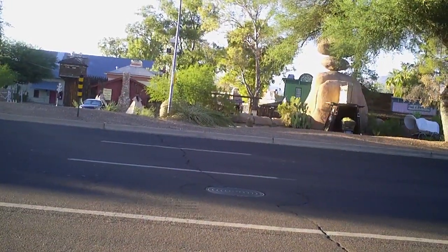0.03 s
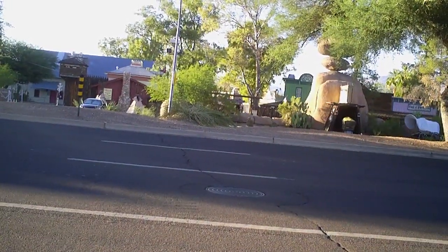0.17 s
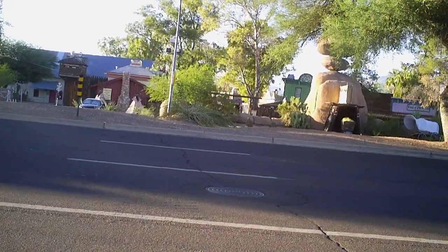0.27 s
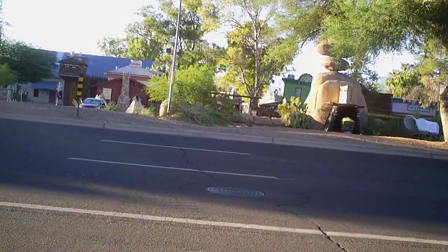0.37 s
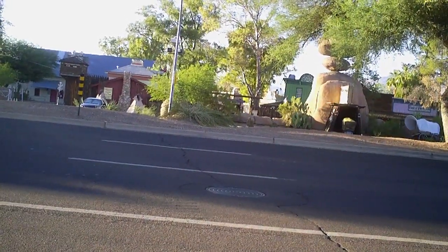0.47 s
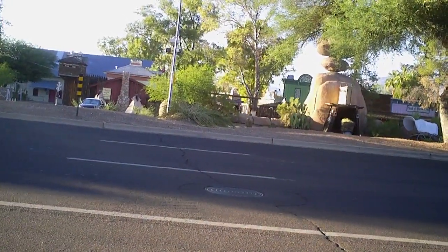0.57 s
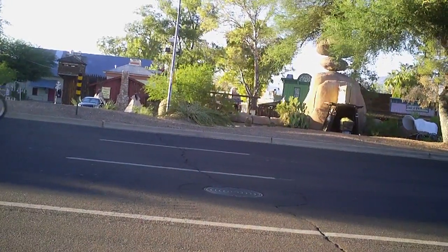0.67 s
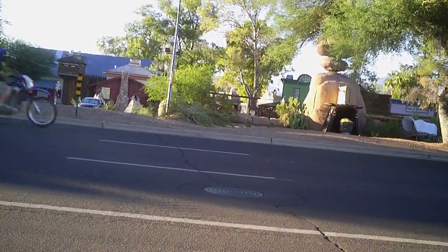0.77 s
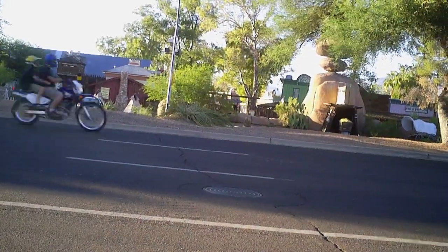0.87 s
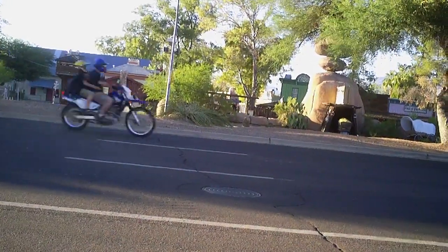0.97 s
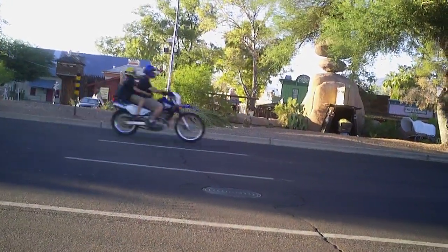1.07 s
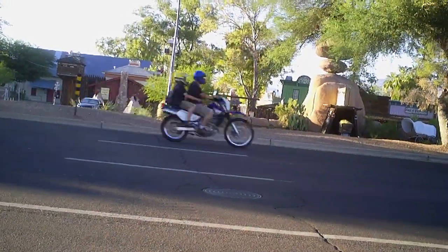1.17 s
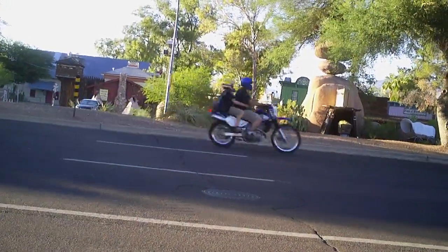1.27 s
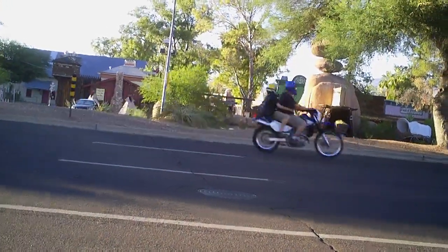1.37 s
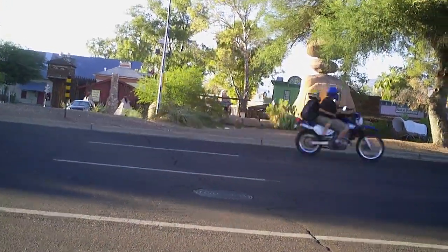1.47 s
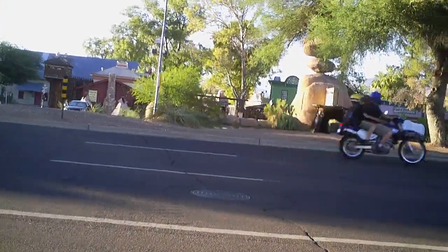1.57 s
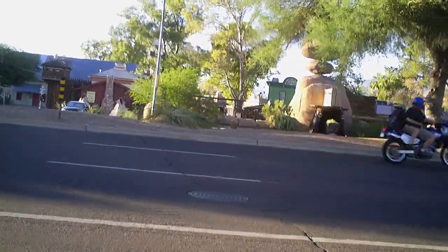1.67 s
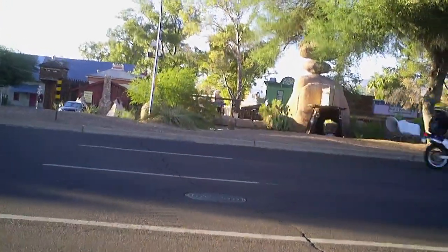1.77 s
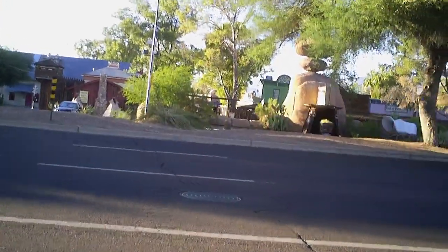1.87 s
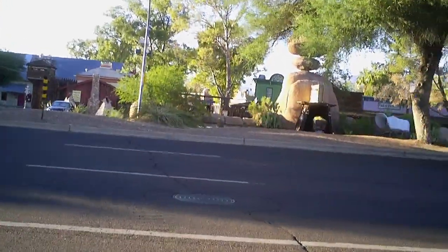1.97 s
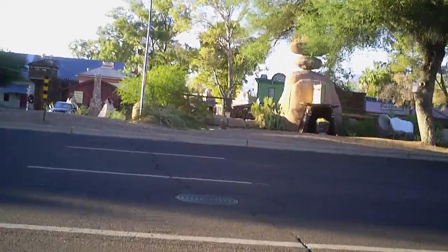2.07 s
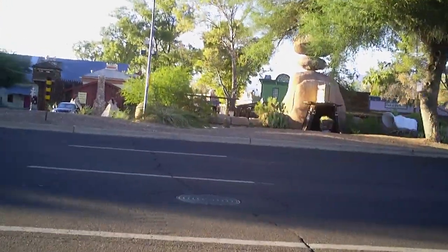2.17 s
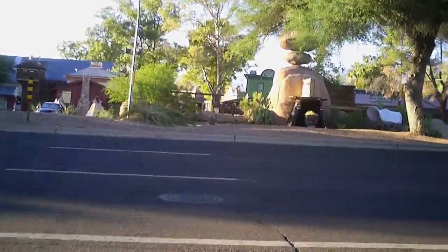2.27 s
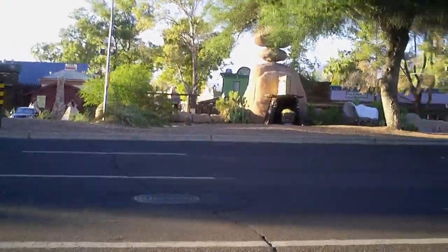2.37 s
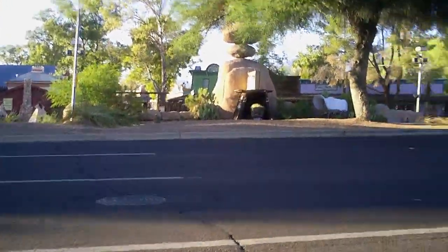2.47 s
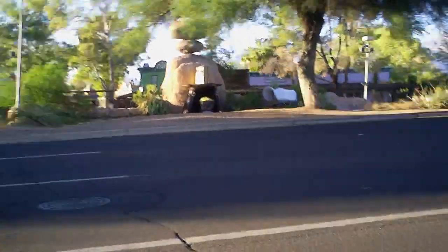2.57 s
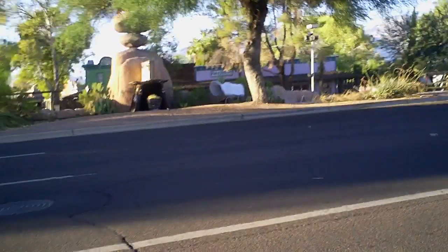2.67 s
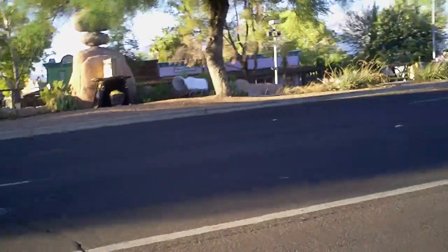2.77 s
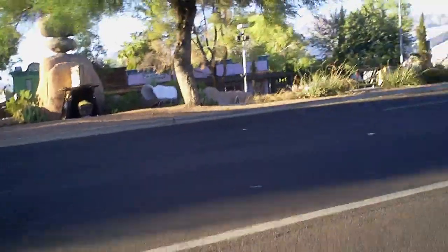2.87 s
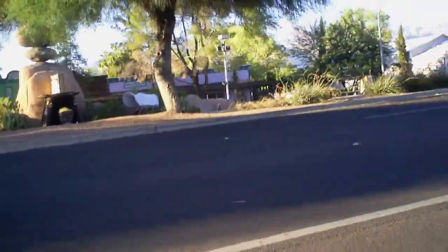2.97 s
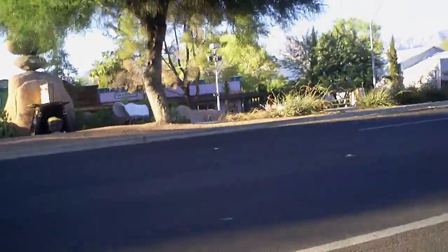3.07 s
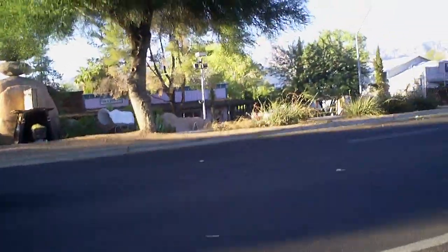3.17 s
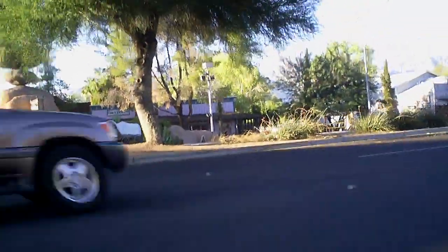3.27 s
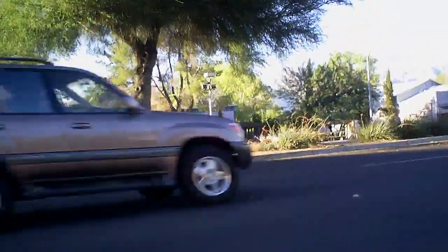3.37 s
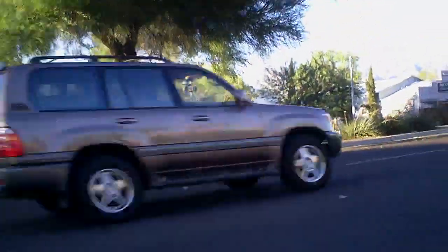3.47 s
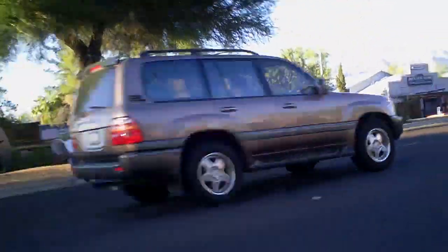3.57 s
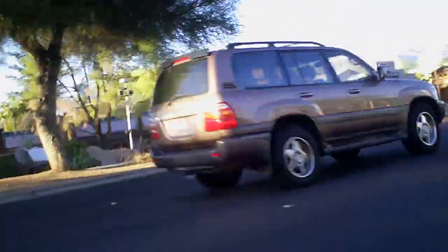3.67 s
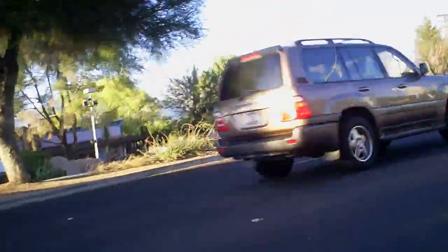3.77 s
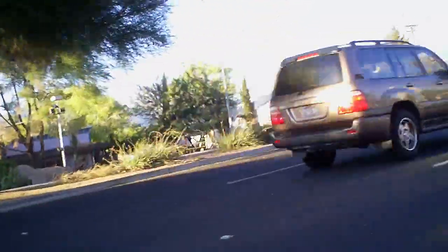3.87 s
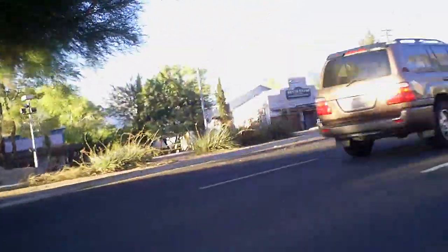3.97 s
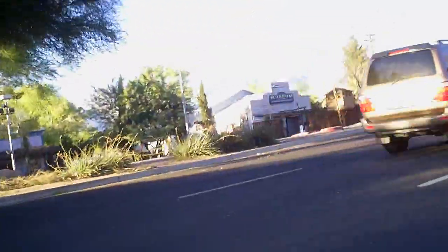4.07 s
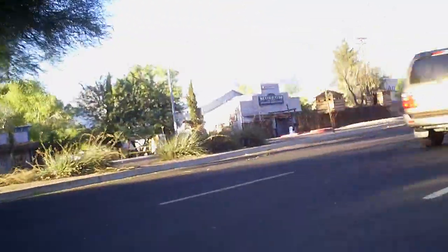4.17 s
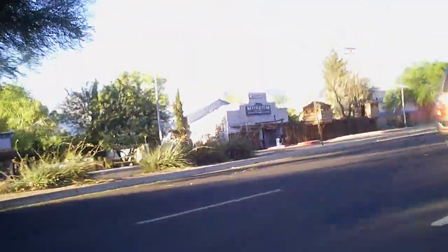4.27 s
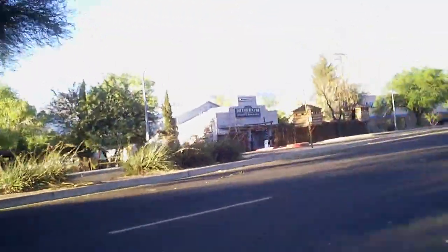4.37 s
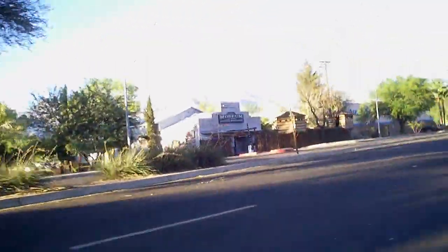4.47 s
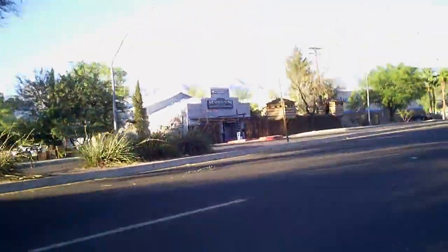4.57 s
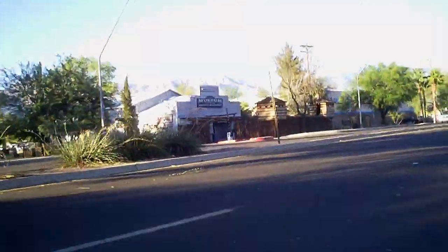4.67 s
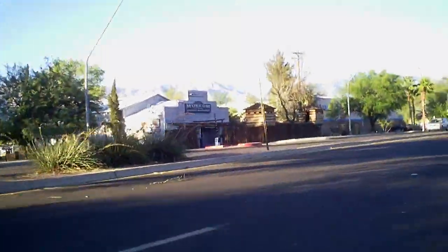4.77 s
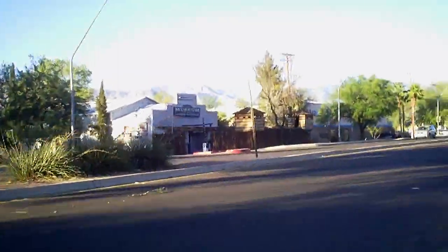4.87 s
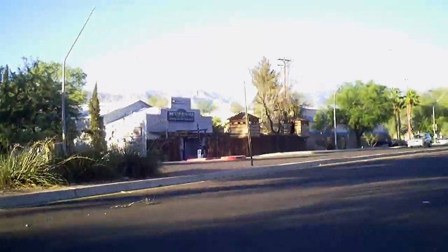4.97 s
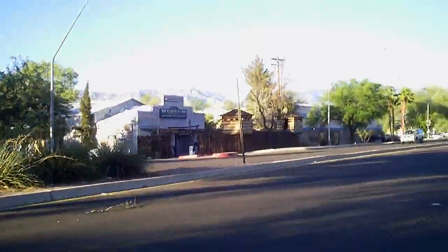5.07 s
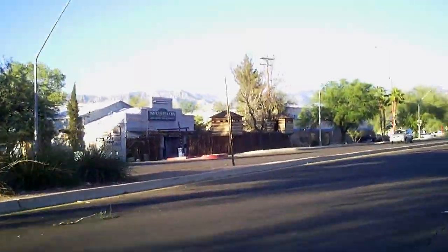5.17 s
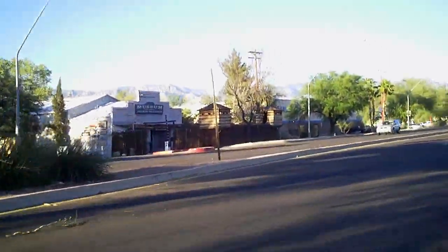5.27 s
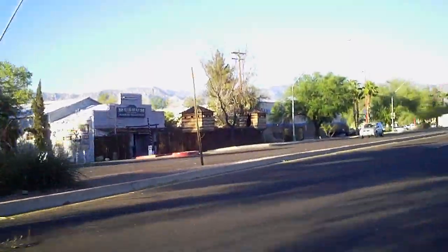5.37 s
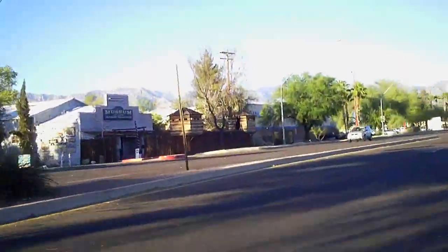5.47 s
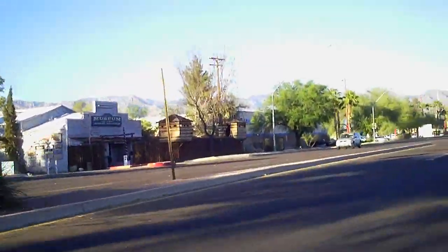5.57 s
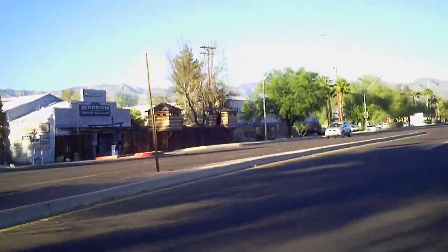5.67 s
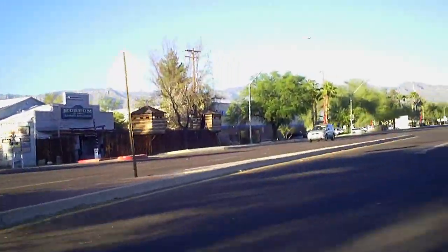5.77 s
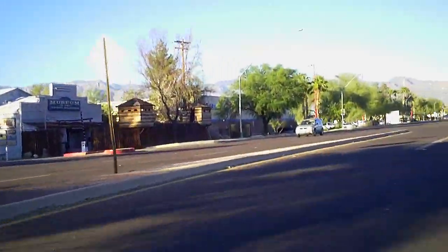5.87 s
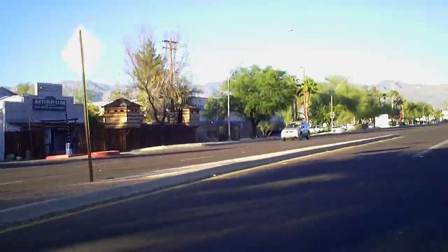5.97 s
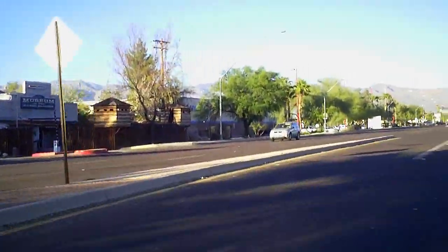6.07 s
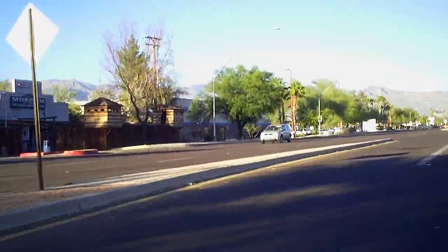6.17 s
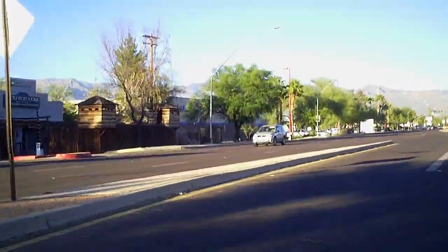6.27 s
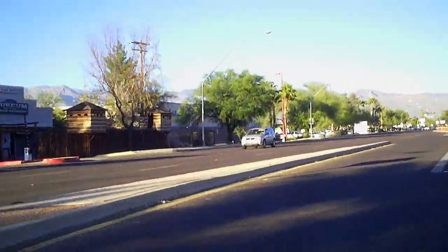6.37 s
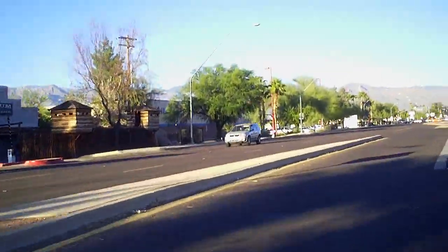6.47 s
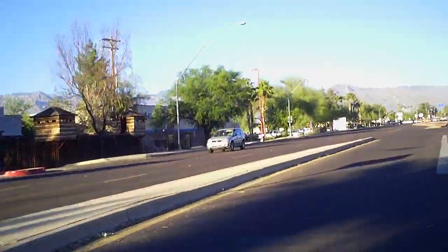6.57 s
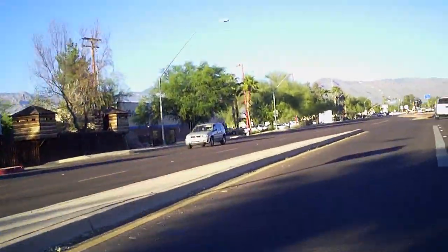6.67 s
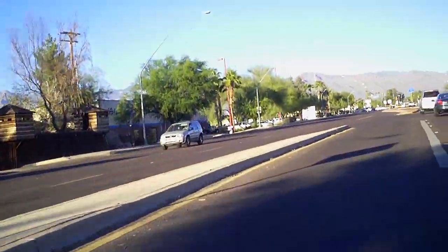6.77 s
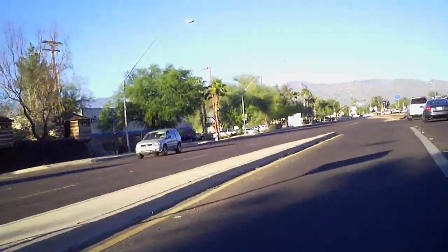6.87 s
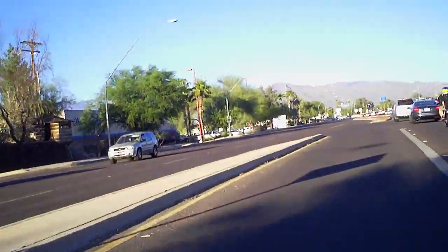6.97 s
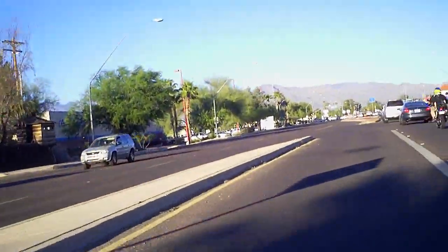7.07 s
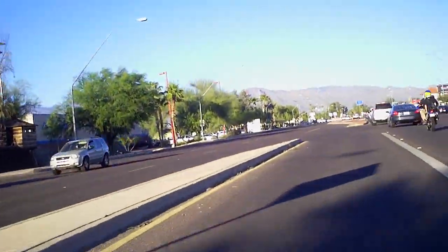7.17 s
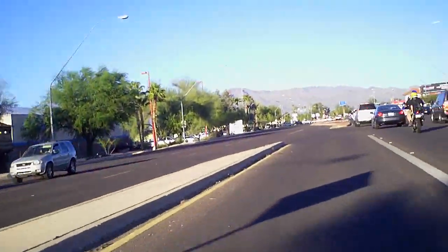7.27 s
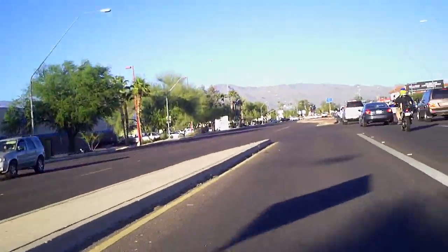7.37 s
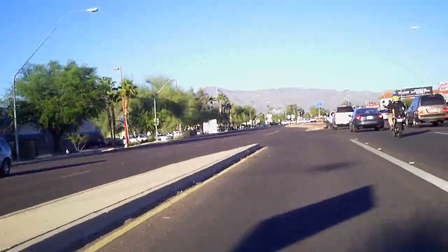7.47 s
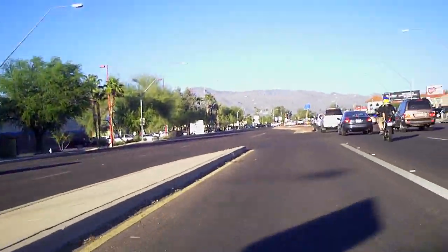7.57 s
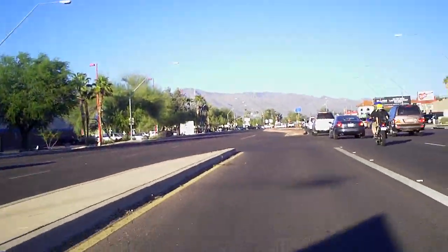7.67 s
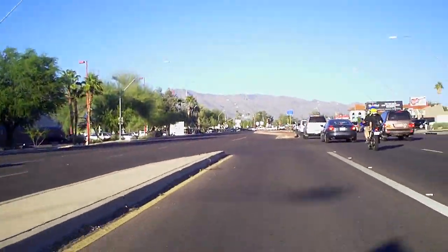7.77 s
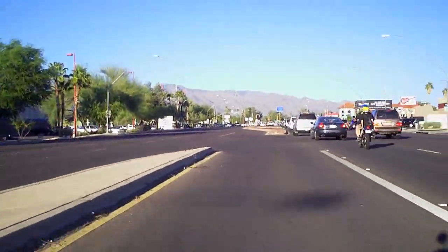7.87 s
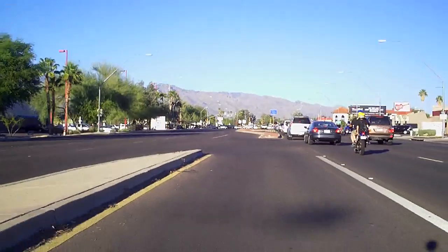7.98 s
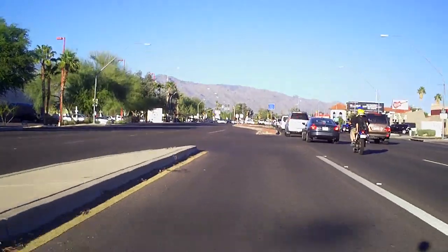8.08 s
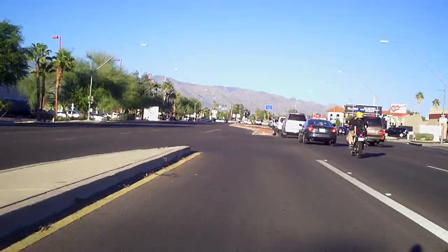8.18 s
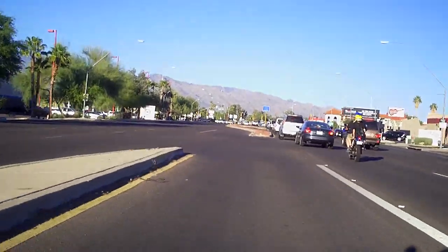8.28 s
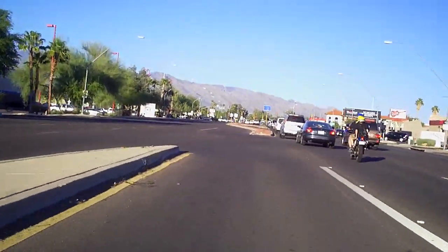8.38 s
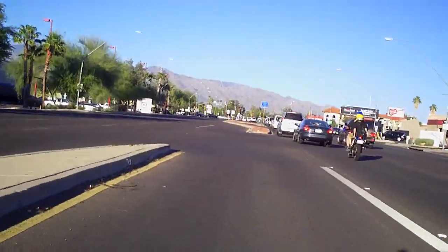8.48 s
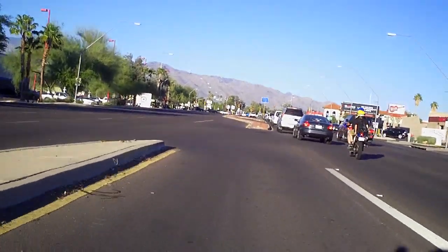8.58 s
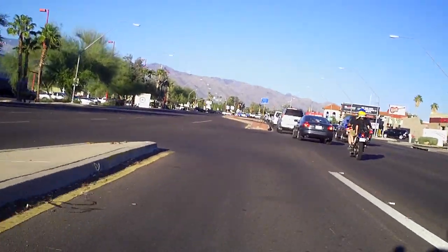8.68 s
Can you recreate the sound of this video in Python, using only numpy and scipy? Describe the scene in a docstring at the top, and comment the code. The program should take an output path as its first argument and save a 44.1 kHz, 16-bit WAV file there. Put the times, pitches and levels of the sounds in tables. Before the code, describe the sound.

A twin-cylinder motorcycle idles with lumpy thumps, then pulls away through two roaring, distorted throttle bursts and settles into a droning cruise with buffeting wind.

```python
"""A twin-cylinder motorcycle engine, heard by a microphone riding on the machine: it idles with uneven thumps,
revs, pulls away through two throttle bursts that overdrive the input, then cruises.
Blows from the cylinders ring the exhaust, and engine orders under throttle add up to a drone.
A gear whines with the crank, noise rings the cases and the frame, distant tyres and passing cars hiss
along the road, and slow noise makes the head wind that buffets the microphone."""
import sys
import numpy as np
from scipy import signal
from scipy.fft import rfft, irfft, next_fast_len
from scipy.io import wavfile
from scipy.ndimage import uniform_filter1d, map_coordinates

SR = 44100
rng = np.random.default_rng(int(sys.argv[2]) if len(sys.argv) > 2 else 0)


def inscribe(sig):
    """Save sig as 16-bit PCM at rate SR to the path in sys.argv[1].

    A 1-D sig is mono; a 2-D sig holds one channel per row.
    Samples are clipped to [-1, 1] before scaling.
    """
    pcm = np.round(np.clip(np.atleast_2d(sig).T, -1, 1) * 32767)
    wavfile.write(sys.argv[1], SR, pcm.astype(np.int16))


N = 385434  # samples

THROTTLE_S = 1.36  # idle ends and the throttle opens

# Engine speed. Each row: time in seconds, engine cycles per second.
ENGINE_SPEED = [(0, 17.1), (.25, 16.7), (.45, 16.6), (.5, 17.2), (.65, 16.7), (.71, 17.8), (.87, 16.6),
                (.94, 17.8), (1.05, 17.2), (1.26, 16.8), (1.43, 24.2), (1.58, 29.3), (1.7, 30.8),
                (1.97, 32.2), (2.26, 32.5), (2.45, 30.3), (2.66, 27.7), (2.82, 27.2), (3.02, 28.1),
                (3.29, 27.1), (3.63, 31.7), (3.85, 34.3), (4.31, 43.8), (4.55, 49.1), (4.74, 43.6),
                (4.89, 52.1), (4.99, 48.4), (5.15, 38.6), (5.4, 40.5), (5.6, 42.5), (5.85, 43.5),
                (5.9, 40.6), (6.11, 28.9), (6.19, 28.5), (6.22, 31.3), (6.32, 37.8), (6.44, 34.2),
                (7.4, 35.6), (7.95, 35.8), (8.07, 31.2), (8.09, 31.2), (8.12, 36.8), (8.23, 33.4),
                (8.3, 34.8), (8.58, 32.3), (8.62, 32.9), (8.74, 29.8)]
# How hard the engine works. Each row: time in seconds, effort in dB, extra drone in dB,
# intake roar over the effort in dB (before a fixed 3 dB cut), boost of the odd engine orders in dB.
ENGINE_EFFORT = [(0, -35, 0, -5.5, 0), (1.22, -31.5, 5.5, -4.5, 3.5), (1.56, -17.5, 2, 1, 0),
                 (2.29, -15.5, 2, -1, 1), (2.5, -17, -1, -0.5, 0.5), (2.8, -17, 3, 0, -2.5),
                 (3.15, -17.5, 5, -0.5, -1.5), (3.6, -13, 1, 0.5, 6), (4.02, -10, -1.5, 1, 3),
                 (4.3, -0.5, 2, -4, -6), (4.6, 0, -2.5, -2, -7), (4.73, -11.5, 1.5, 1.5, 1),
                 (4.83, -1.5, 2.5, 0.5, -0.5), (4.99, -1, 2.5, -0.5, -6.5), (5.16, -8, -1.5, -2, 0.5),
                 (5.55, -5, 1.5, -2, 0.5), (5.62, -3, 1, -1, -2.5), (5.87, -4, 3.5, -1.5, -6),
                 (5.95, -14.5, -3, -0.5, -0.5), (6.08, -17.5, 1.5, -3, -0.5), (6.35, -13, -2, -2, 1.5),
                 (7.1, -13, -1, -1.5, -1), (7.9, -13.5, 0.5, -1, -4.5), (8.05, -12.5, -1.5, -3, -3.5),
                 (8.2, -12, -3.5, -0.5, -2), (8.74, -17.5, 1, 1, -4)]


def amp(db):
    """dB to gain."""
    return 10 ** (np.asarray(db) / 20)


def unit(x):
    """Scaled to rms 1."""
    return x / np.sqrt(np.mean(x ** 2) + 1e-20)


def along(points, hz):
    """Value at hz between (Hz, value) points on a log axis."""
    f, v = np.transpose(points)
    return np.interp(np.log(hz + 1), np.log(f + 1), v)


def curves(rows):
    """One value per sample for each column after the time."""
    s, *columns = np.transpose(rows)
    t = np.arange(N) / SR
    return [np.interp(t, s, column) for column in columns]


def wobble(rate):
    """A smooth random curve with rate knots a second."""
    knots = rng.standard_normal(int(N * rate / SR) + 4)
    return map_coordinates(knots, [np.arange(N) * rate / SR])


def filtered(x, response):
    """x through a complex response, a function of frequency in Hz."""
    m = next_fast_len(N + SR // 2)  # room for the tail
    return irfft(rfft(x, m) * response(np.fft.rfftfreq(m, 1 / SR)), m)[..., :N]


def resonant(x, modes):
    """x through parallel damped resonances (Hz, width Hz, dB) of alternating sign."""
    def response(f):
        return sum((-1) ** k * amp(db) * 1j * f * width / (hz * hz - f * f + 1j * f * width)
                   for k, (hz, width, db) in enumerate(modes))
    return filtered(x, response)


def low_passed(x, corner_hz, order):
    """x with its treble rolled off by a chain of one-pole low-passes."""
    return filtered(x, lambda hz: 1 / (1 + 1j * hz / corner_hz) ** order)


def noise(spectrum):
    """Coloured noise of rms 1."""
    return unit(filtered(rng.standard_normal(N), lambda hz: amp(along(spectrum, hz))))


def idle_firings():
    """Lumpy blows into the pipe: uneven in time, every other one stronger."""
    count, first_s, gap_s, jitter_s = 23, .013, .059, .0015
    level_db, lope_db, scatter_db = -15, 1.2, 0.5  # level is ahead of the pipe
    k = np.arange(count)
    chance = rng.standard_normal((count, 2))
    s = first_s + gap_s * k + jitter_s * chance[:, 0]
    size_db = level_db - lope_db * (-1) ** k + scatter_db * chance[:, 1]
    return np.bincount((s * SR).astype(int), amp(size_db), N)


def loaded_firings():
    """Under throttle two cylinders blow half an engine cycle apart, harder with effort."""
    bark_db, bark_grows = -4.5, 1.2  # at effort 0, ahead of the silencer; dB per dB of effort
    second_share = 0.54  # second cylinder against the first when the odd orders stand at 0 dB
    rate, = curves(ENGINE_SPEED)
    effort_db, _, _, odd_db = curves(ENGINE_EFFORT)
    blow_db = bark_db + bark_grows * effort_db
    second = np.clip(1 - (1 - second_share) * amp(odd_db), 0, 1)
    halves = np.floor(2 * np.cumsum(rate) / SR)
    throttle_open = np.arange(N - 1) > THROTTLE_S * SR
    at = np.flatnonzero((np.diff(halves) > 0) & throttle_open)
    scattered_db = blow_db[at] + 0.62 * rng.standard_normal(len(at))
    size = np.where(halves[at] % 2, second[at], 1) * amp(scattered_db)
    return np.bincount(at, size, N)


def exhaust(idle, loaded):
    """The pipe thumps and rings after every blow; the valve opens gradually, so the blows are soft."""
    # Idle ring of the pipe. Each row: Hz, width in Hz, relative level in dB.
    pipe_modes = [(35, 6.7, -28), (213.3, 8.3, -2), (251, 52, -15.5), (356, 14, -6), (530, 20, -10)]
    # Silencer under load. Each row: Hz, width in Hz, relative level in dB.
    silencer_modes = [(350, 40, -4.5), (385.4, 60, -0.5), (424, 70, -3)]
    # Idle thump. One row: Hz, width in Hz, gain in dB.
    thump_mode = [(91.5, 61, 50.5)]
    (hz, width, db), = thump_mode
    thump = idle
    for _ in range(3):  # three passes let it swell before it dies
        thump = resonant(thump, [(hz, width, 0)])
    idling = np.arange(N) < THROTTLE_S * SR
    gas = amp(-44.5) * rng.standard_normal(N) * idling  # steady flow in the pipe
    ring = amp(49.0) * low_passed(resonant(idle + gas, pipe_modes), corner_hz=290, order=2)
    bark = amp(45.5) * low_passed(resonant(loaded, silencer_modes), corner_hz=720, order=2)
    return amp(db) * thump + ring - bark


def burst(blows, decay_s):
    """Envelope averaging near 1 that jumps at each firing and dies away."""
    puff = signal.lfilter([1], [1, -np.exp(-1 / (decay_s * SR))], blows)
    return puff / (uniform_filter1d(puff, size=SR // 8) + 1e-9)


def roar(blows):
    """Turbulent intake gas: coloured noise puffed once a firing."""
    # Spectrum of the rush. Each row: Hz, relative density in dB per Hz.
    roar_spectrum = [(20, -41.5), (45, -18.5), (75, -6.5), (130, -0.5), (250, 1), (420, -0.5), (600, -7.5),
                     (900, -52.5), (1500, -40), (2500, -88.5)]
    effort_db, _, above_db, _ = curves(ENGINE_EFFORT)
    level_db = effort_db + above_db - 3 + 1.0 * wobble(6.3)
    puffing = 1.7 + 0.21 * burst(blows, decay_s=0.032)
    return amp(level_db) * unit(noise(roar_spectrum) * puffing)


def spiky_noise(extra):
    """White noise with rare samples enlarged by extra times their size."""
    return rng.standard_normal(N) * (1 + extra * (rng.random(N) < .003))


def rattle(blows):
    """Valve gear, chain and each firing shake the cases, which ring and hiss."""
    # Ringing of the engine cases. Each row: Hz, width in Hz, relative level in dB.
    case_modes = [(874, 99, 0), (1044, 63, 1.5), (1181.4, 29, 5.5), (1382, 30, 2), (1500, 36, -0.5),
                  (1688, 147, 0.5), (2113, 247, -8), (2742, 70, -14), (3320, 180, -13), (3836, 42, -8.5),
                  (4310, 304, -14.5)]
    # Broad hiss of the case walls. Each row: Hz, relative density in dB per Hz.
    wall_spectrum = [(300, -19.5), (700, -2), (1200, -3), (1800, -15), (2300, -17), (3500, -20.5),
                     (4700, -33), (7000, -37), (12000, -78.5)]
    level_at_full_db, grows = -22, 0.57  # ring at effort 0; dB per dB of effort
    swell = 1.01 + 0.075 * uniform_filter1d(burst(blows, decay_s=0.0025), size=SR // 300)
    clatter = unit(spiky_noise(9.7)) * swell
    knocks = unit(np.diff(burst(blows, decay_s=0.00024), prepend=0))
    ring = unit(resonant(clatter + 0.37 * knocks, case_modes))
    hiss = 1.23 * swell * noise(wall_spectrum)
    level_db = level_at_full_db + grows * curves(ENGINE_EFFORT)[0] + 0.25 * wobble(10)
    return amp(level_db) * (ring + hiss)


def whine(idle, blows):
    """Gear mesh tone and octave; firings kick the crank, idle compression slows it and loads the teeth."""
    # Gear cover. Each row: Hz, width in Hz, relative level in dB.
    cover_modes = [(800, 280, -11.5), (1408, 63, 1.5), (1510, 49, 4), (1666, 160, -4), (1727, 35, -0.5),
                   (1915, 168, -2.5)]
    # Each row: time in seconds, whine level ahead of the cover in dB, depth of the throb once a cycle,
    # speed swing within a cycle as a share of the speed.
    whine_course = [(0, -32.5, 0.12, .01), (1.24, -32, 0.12, .01), (1.3, -35, 0.2, .01),
                    (1.45, -29, 1.3, .01), (1.6, -26.5, 0.99, 0.015), (1.95, -28, 0.45, -0.009),
                    (2.25, -26, 0.93, -.025), (2.42, -27.5, 0.67, 0.016), (2.6, -30, 1.3, .015),
                    (2.9, -31.5, 1, 0.015), (3.2, -33, 0.89, .015), (3.35, -27, 1.1, 0.015),
                    (3.5, -25.5, 1.2, 0.014), (3.75, -26.5, .8, .012), (3.95, -25.5, 1.5, 0.0047),
                    (4.2, -39, 0.6, .01), (5, -24, 1.6, .01), (5.84, -44, 1, .01), (5.89, -39, 0, -0.0096),
                    (5.99, -30, 0, 0.01), (6.1, -30, 0.28, 0.013), (6.13, -43, 0.6, -0.0059),
                    (6.19, -48, .5, .01), (6.22, -28.5, 0.33, 0.029), (6.33, -27.5, .4, 0.017),
                    (6.37, -28, 1.2, 0.003), (6.43, -26, 0.94, 0.026), (7.9, -25.5, 0.52, 0.0077),
                    (8.0, -29.5, 0.39, 0), (8.08, -28.5, 0.41, 0.0048), (8.095, -43, .2, -0.019),
                    (8.12, -26.5, 0.086, 0), (8.3, -31, 0.75, -0.013), (8.6, -31.5, 0.18, 0),
                    (8.74, -33, .15, 0.01)]
    # Each row: time in seconds, whine pitch over the engine cycle rate, white noise relative to the tone.
    mesh_course = [(0, 48, 1.4), (1.22, 47.98, 1.2), (1.3, 39.94, 1.7), (1.45, 48, 1.8), (1.62, 49.5, 2.2),
                   (2, 47.5, 2.1), (2.3, 47.3, 1.6), (2.42, 48.5, 2.1), (2.7, 49.5, 1.8), (3.3, 50.5, 1.4),
                   (3.5, 50.8, 1.8), (3.7, 51.5, 2.6), (3.9, 51.5, 2.5), (4.2, 49, 1.4), (5.8, 48, 1.1),
                   (6.1, 48.2, 0.34), (6.4, 48, 1.6), (7, 48.3, 1), (7.9, 48.3, 1), (8, 48, 0.52),
                   (8.74, 48.45, .5)]
    kick_lag_s = .029  # from the blow to the crank's next surge
    squeeze_lag_s, squeeze_sag, squeeze_db = .022, .06, 2  # after the blow; pitch share; louder teeth
    rate, = curves(ENGINE_SPEED)
    ratio, grit = curves(mesh_course)
    level_db, throb, swing = curves(whine_course)
    surge = uniform_filter1d(burst(blows, decay_s=0.074), size=SR // 150) - 1
    kick = np.roll(surge, int(kick_lag_s * SR))
    squeeze = np.convolve(idle > 0, np.hanning(SR // 55), "same")
    squeeze = np.roll(squeeze, int(squeeze_lag_s * SR))
    beat = np.cos(2 * np.pi * np.cumsum(rate) / SR + 0.73 + 0.68 * wobble(25))
    octave = np.clip(3 - rate / 8, 0, 1)  # the slack teeth of idle touch twice a mesh
    wander = .006 * wobble(40) + .006 * octave * wobble(8)
    kick_bend = .045 * kick * (17 / rate) ** 3  # slow cranks give way more
    sag = squeeze_sag * (squeeze - .15 * octave)
    hz = ratio * rate * (1 + kick_bend - sag + wander + swing * beat)
    turn = 2 * np.pi * np.cumsum(hz) / SR
    load = np.exp(throb * beat - throb ** 2 / 1.4) * amp(squeeze_db * squeeze)
    tone = np.sin(turn) + octave * np.sin(2 * turn)
    mesh = np.sqrt(2) * (tone + grit * rng.standard_normal(N)) * load
    return resonant(amp(level_db + 1.1 * wobble(30)) * mesh, cover_modes)


def frame():
    """Road shake and single knocks ring the frame."""
    # Each row: Hz, width in Hz, relative level in dB.
    frame_modes = [(780, 120, -1), (954, 40, 3), (1159, 50, -6), (1357, 20, -9)]
    # Each row: time in seconds, rattle of the frame in dB.
    shake_course = [(0, -37), (1.4, -40), (2.4, -48), (2.8, -34), (3.6, -27.5), (4.4, -25.5), (5.9, -30.5),
                    (6.2, -30.5), (6.6, -33.5), (6.95, -34), (7.1, -28.5), (7.9, -32), (8.02, -34),
                    (8.74, -36.5)]
    # Each row: start in seconds, relative strength in dB.
    knock_times = [(3.201, -7), (3.355, -7), (5.329, -6.5), (5.518, -6.5), (5.862, -10), (6.661, -12)]
    t = np.arange(SR // 100) / SR
    hits = np.zeros(N)
    puffs = rng.standard_normal((len(knock_times), len(t))) * amp(-60 * t / 0.0079)  # 60 dB down in 7.9 ms
    for (s, db), puff in zip(knock_times, puffs):
        hits[round(s * SR):][:len(t)] += amp(db + 21) * puff
    shake = unit(resonant(spiky_noise(8), frame_modes))
    level_db = curves(shake_course)[0] + 0.47 * wobble(7.2)
    return amp(level_db) * shake + resonant(hits, frame_modes)


def traffic():
    """Tyre noise from far along the road and from cars whose power rises and falls as they pass."""
    # Tyre hiss. Each row: Hz, relative density in dB per Hz.
    tyre_spectrum = [(100, 29.5), (400, -21), (900, 16.5), (1500, -25), (2500, -56), (5000, -30),
                     (8000, -64), (12000, -60)]
    # Passing cars. Each row: time nearest in seconds, peak level in dB, seconds to fall to half power.
    passing_cars = [(3.55, -25.5, 0.44), (7.398, -40, .7)]
    distant_db = -43.5
    t = np.arange(N) / SR
    power = amp(2 * distant_db)
    for s, db, half_s in passing_cars:
        power = power + amp(2 * db) / (1 + ((t - s) / half_s) ** 2)
    return np.sqrt(power) * amp(0.48 * wobble(1.9)) * noise(tyre_spectrum)


def wind():
    """Lumpy pressure on the microphone port; it grows as the motorcycle gathers speed."""
    # Buffeting. Each row: Hz, relative density in dB per Hz.
    buffet_spectrum = [(5, -18), (15, -26), (40, -8), (150, -14), (500, -17.5), (2000, -81)]
    roll_s, up_to_speed_s = 3.8, 4.6
    still_db, riding_db, gust_db = -31, -16, -1
    level_db = np.interp(np.arange(N) / SR, [roll_s, up_to_speed_s], [still_db, riding_db])
    lumps = unit(amp(1.8 * wobble(10)) * noise(buffet_spectrum))
    return amp(level_db + gust_db * wobble(3.8)) * lumps


def drone():
    """Low engine orders, lined up as one suction dip a cycle; they fade in as the throttle opens."""
    # Each row: multiple of the cycle rate, level at effort 0 in dB, growth in dB per dB of effort.
    engine_orders = [(1, -8.5, 1.2), (2, -0.5, 1.5), (3, -4.5, 1), (4, -3.5, 1.45), (5, -9.5, 2.1),
                     (6, -11.5, 0.77), (7, -20, 0.6), (8, -4.5, 2), (9, -17, 0.9), (10, -12.5, 1),
                     (12, -23.5, 1)]
    # The airbox favours orders that pass its resonances. Each row: Hz, gain in dB.
    airbox_gain = [(28, -8.5), (45, 0.5), (55, -3), (63, -2), (71, -1), (80, -3), (92, -1), (105, 0.5),
                   (112, 1.5), (125, -2.5), (140, 1), (162, -11), (175, -1), (192, 1.5), (212, 2),
                   (232, -7), (250, -11.5), (290, -1.5), (320, -0.5), (345, -3.5), (368, 3), (395, 1.5),
                   (430, -6.5), (500, -6)]
    rate, = curves(ENGINE_SPEED)
    effort_db, extra_db, _, odd_db = curves(ENGINE_EFFORT)
    turn = 2 * np.pi * np.cumsum(rate) / SR
    opened = np.clip((np.arange(N) / SR - THROTTLE_S) / 0.017, 0, 1)
    dips = np.zeros(N)
    for order, db, grows in engine_orders:
        k = np.round(order)
        level_db = db + grows * effort_db + k % 2 * odd_db + along(airbox_gain, k * rate)
        dips += amp(level_db + 0.48 * wobble(14)) * np.cos(k * turn + 0.19 * wobble(10))
    return -opened * np.sqrt(2) * amp(extra_db) * dips


def crack(loaded):
    """Wide open, each blow starts with a steep drop of pressure that recovers in milliseconds."""
    over_blow_db, grows = 1.5, 0.95  # at effort 0; dB per dB of effort
    lead_s = 0.0018  # ahead of the suction dip
    size = amp(over_blow_db + grows * curves(ENGINE_EFFORT)[0])
    steps = np.roll(loaded * size, -int(lead_s * SR))
    drop = signal.lfilter([1], [1, -np.exp(-1 / (0.0046 * SR))], steps)  # 4.6 ms recovery
    return -low_passed(drop, corner_hz=3500, order=1)


def buzz():
    """Noise in narrow resonances that each fade in and out."""
    # Each row: start in seconds, end in seconds, Hz, width in Hz, level in dB.
    buzz_bands = [(1.447, 2.348, 1196, 49.5, -35), (1.5, 2.368, 1730, 197, -36.5),
                  (3.52, 3.971, 1514, 45, -31), (4.978, 5.101, 1680, 80, -24),
                  (5.4, 5.85, 2690, 120, -35.5)]
    fade_s = 0.053
    t = np.arange(N) / SR
    out = np.zeros(N)
    for start, end, hz, width, db in buzz_bands:
        fade = np.clip(np.minimum(t - start, end - t) / fade_s, 0, 1)
        out += amp(db) * fade * unit(resonant(rng.standard_normal(N), [(hz, width, 0)]))
    return out


def ticks():
    """Faint sharp ticks in the treble: noise that dies within milliseconds."""
    # Each row: start in seconds, relative strength in dB.
    tick_times = [(4.0406, -34.5), (4.356, -38.5), (4.5026, -31), (4.549, -33), (4.632, -31.5),
                  (4.709, -28.5), (4.76, -39.5), (4.818, -30), (4.835, -31.5), (5.353, -31), (5.372, -34.5),
                  (5.386, -35), (5.401, -34), (5.562, -39.5), (5.604, -27.5), (5.672, -35.5),
                  (5.738, -35.5), (5.805, -30.5), (6.263, -38), (6.744, -39), (6.8386, -33),
                  (6.8757, -40.5), (7.119, -44), (7.187, -34), (7.213, -37), (7.4571, -39.5), (7.673, -40),
                  (7.7616, -36), (7.918, -42), (8.2, -40), (8.451, -40), (8.504, -39.5)]
    t = np.arange(SR // 200) / SR
    out = np.zeros(N)
    snaps = rng.standard_normal((len(tick_times), len(t))) * amp(-60 * t / .004)  # 60 dB down in 4 ms
    for (s, db), snap in zip(tick_times, snaps):
        out[round(s * SR):][:len(t)] += amp(db + 21.5) * snap
    return low_passed(out, corner_hz=7000, order=2)


def scene():
    """All sources at one microphone."""
    idle, loaded = idle_firings(), loaded_firings()
    blows = idle + loaded
    engine = exhaust(idle, loaded) + roar(blows) + rattle(blows) + whine(idle, blows)
    engine = engine + drone() + crack(loaded)
    return (engine + frame() + traffic() + wind() + buzz() + ticks())[None]


def record(dry):
    """The treble is dulled, the input clips and both ends of the band are rolled off."""
    # Treble ahead of the clipping. Each row: Hz, gain in dB.
    treble_gain = [(4500, 0), (5600, -1.5), (6200, -4), (9000, -5.5), (11800, -4.5), (12600, -16)]
    clip_level, knee = .72, 11  # a higher knee clips harder
    top_hz = 15800  # nothing passes above

    def band(hz):
        treble = 1 / (1 + 1j * hz / 7500) ** 2
        bass = hz / (hz - .4j)
        return treble * bass * (hz < top_hz)

    heard = filtered(dry, lambda hz: amp(along(treble_gain, hz)))
    clipped = heard / (1 + np.abs(heard / clip_level) ** knee) ** (1 / knee)
    return filtered(clipped, band)


dry = scene()
out = record(dry)
inscribe(out)
```